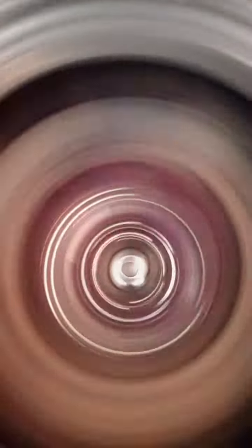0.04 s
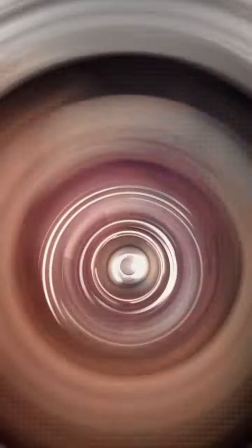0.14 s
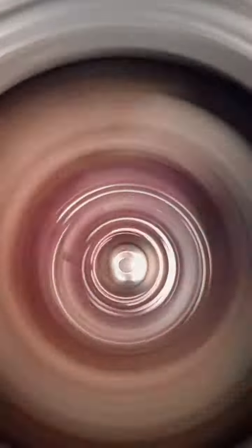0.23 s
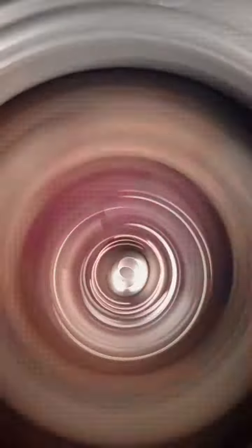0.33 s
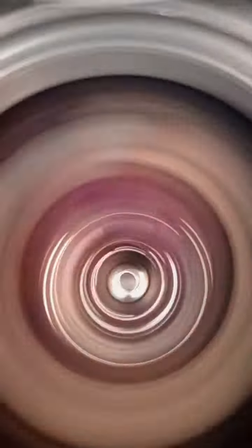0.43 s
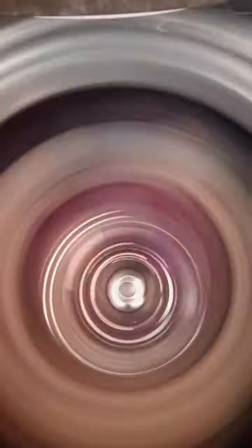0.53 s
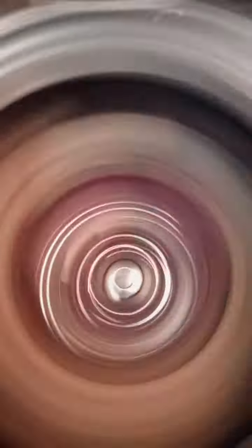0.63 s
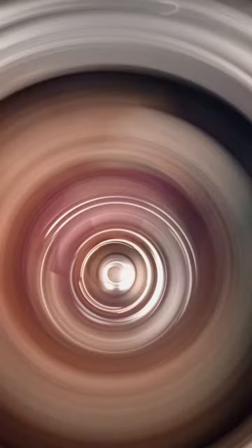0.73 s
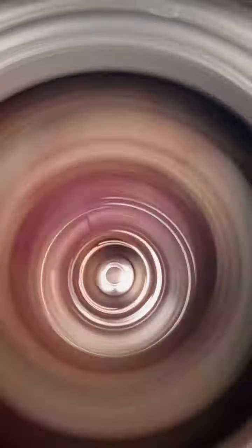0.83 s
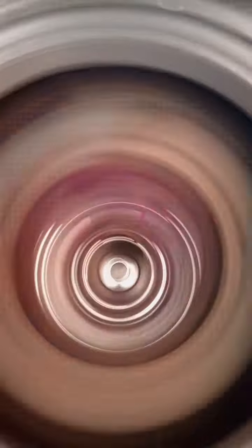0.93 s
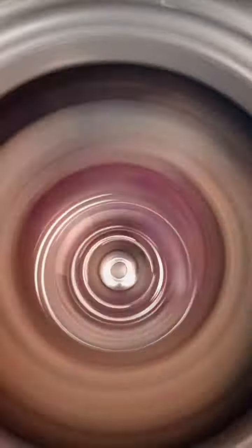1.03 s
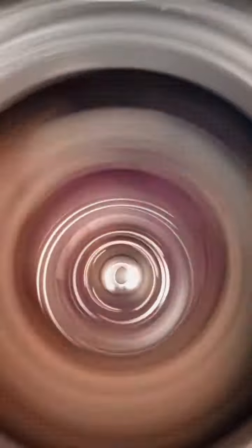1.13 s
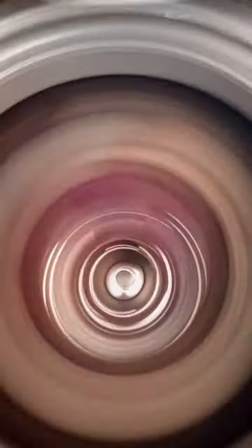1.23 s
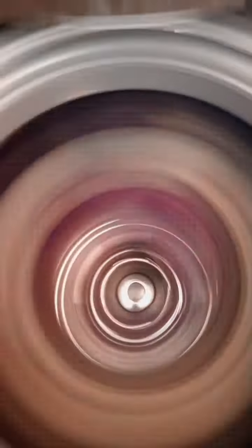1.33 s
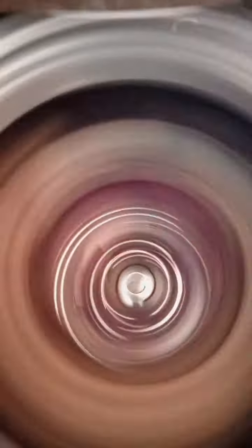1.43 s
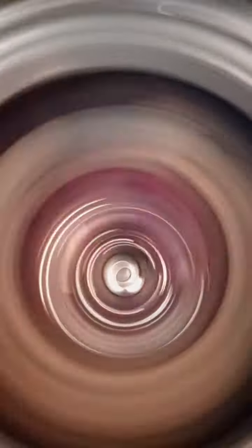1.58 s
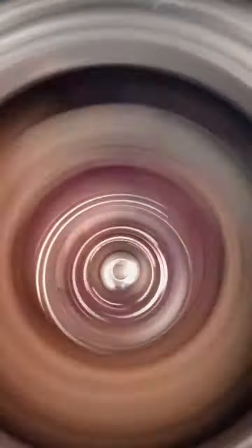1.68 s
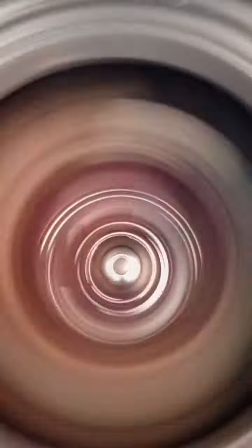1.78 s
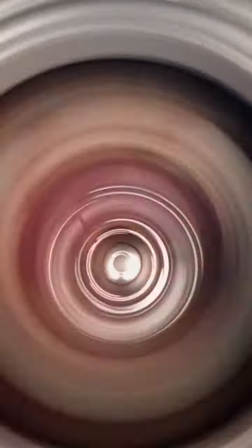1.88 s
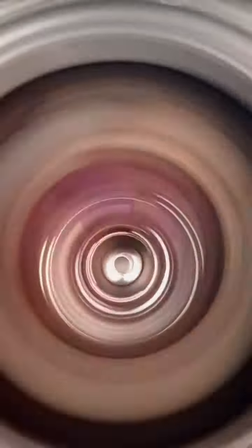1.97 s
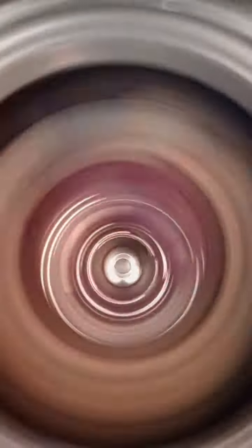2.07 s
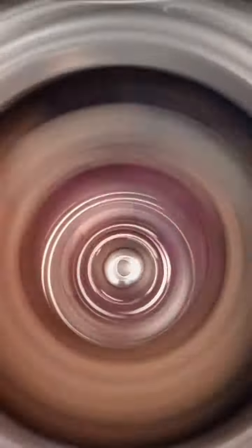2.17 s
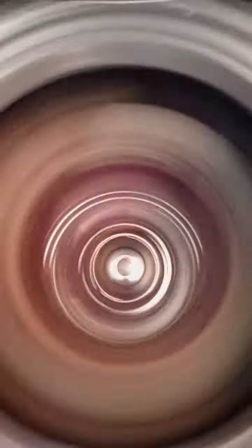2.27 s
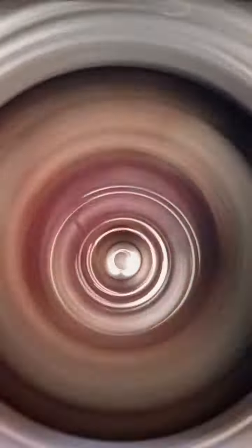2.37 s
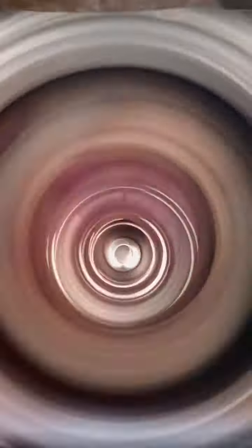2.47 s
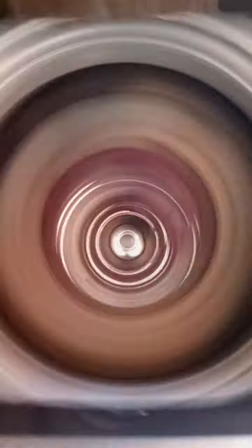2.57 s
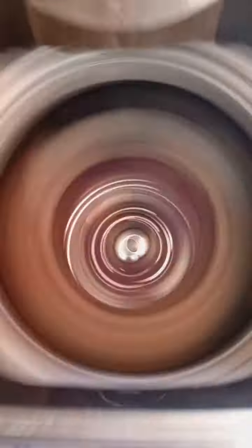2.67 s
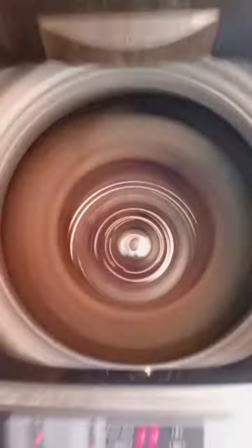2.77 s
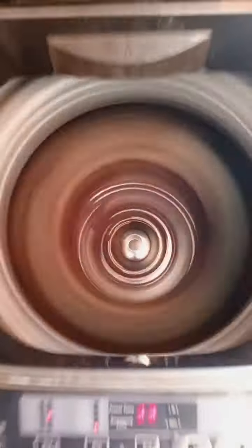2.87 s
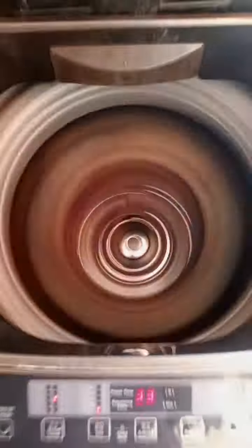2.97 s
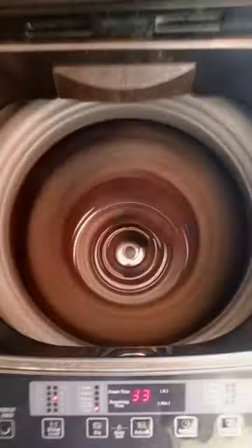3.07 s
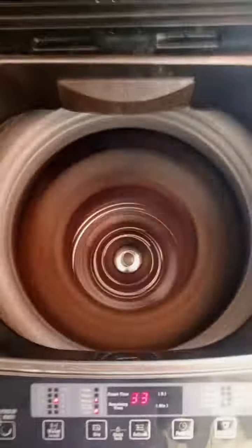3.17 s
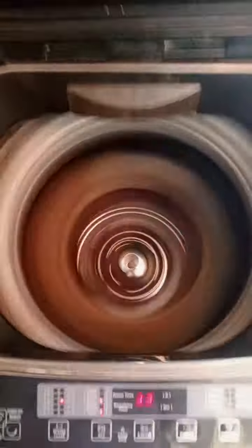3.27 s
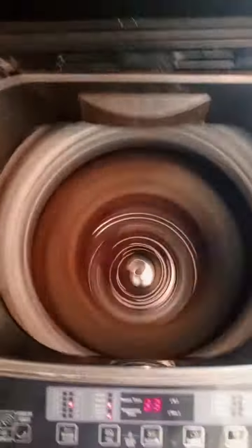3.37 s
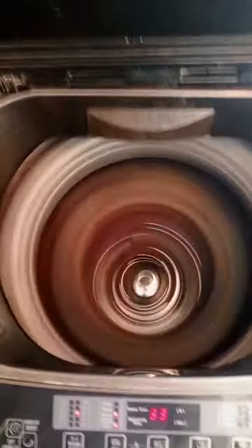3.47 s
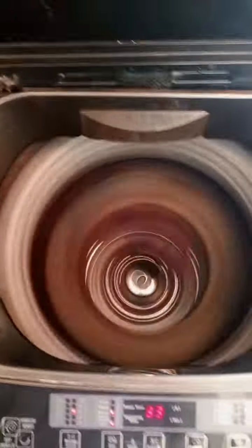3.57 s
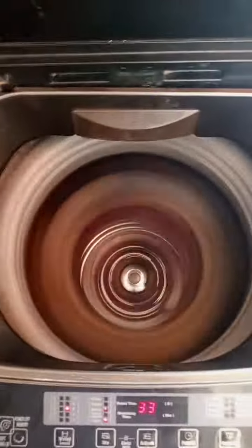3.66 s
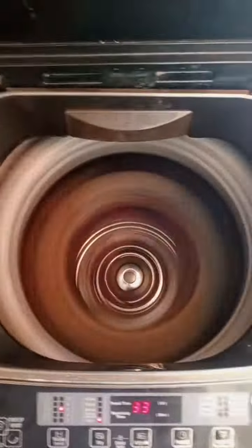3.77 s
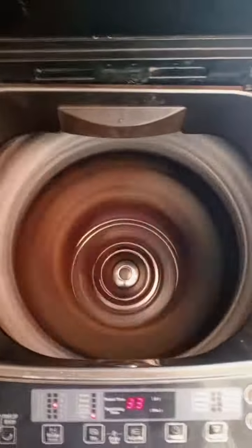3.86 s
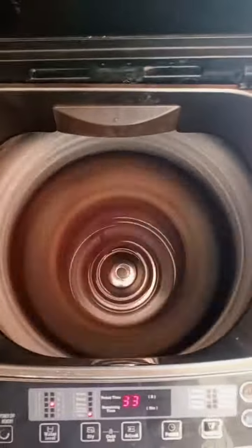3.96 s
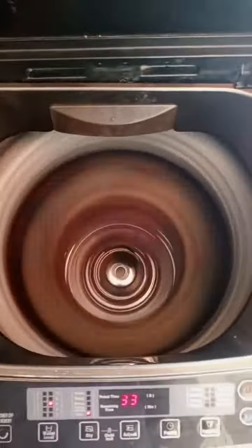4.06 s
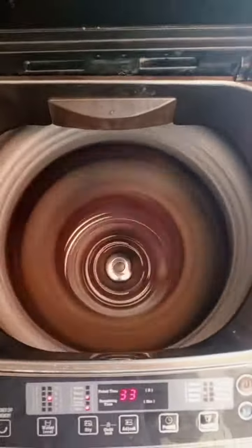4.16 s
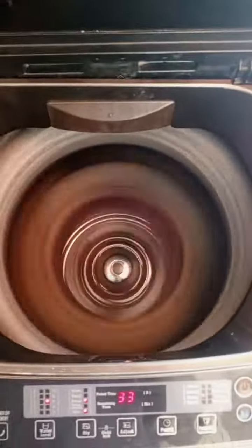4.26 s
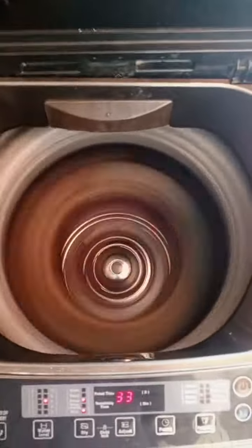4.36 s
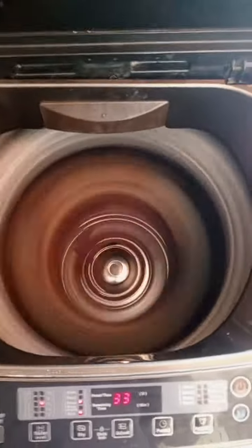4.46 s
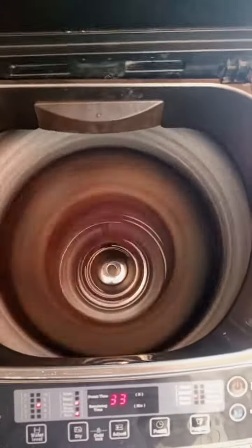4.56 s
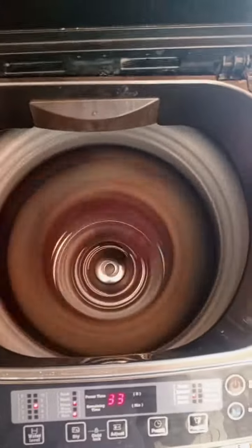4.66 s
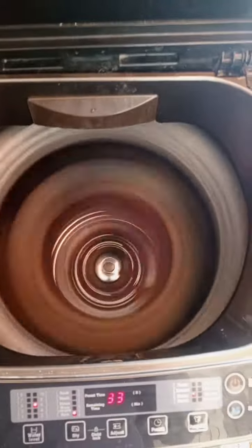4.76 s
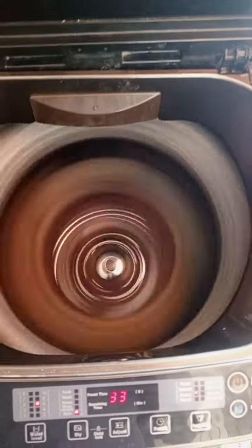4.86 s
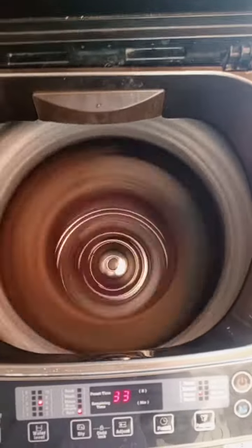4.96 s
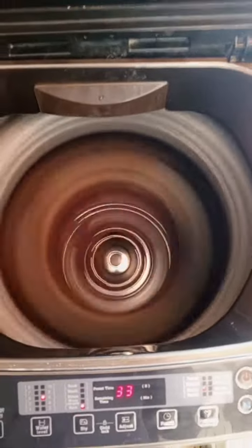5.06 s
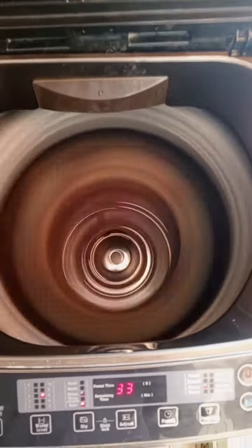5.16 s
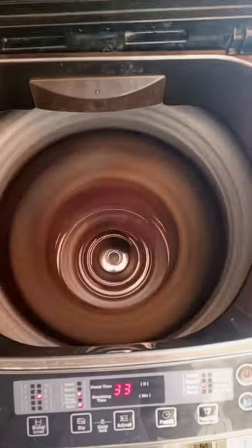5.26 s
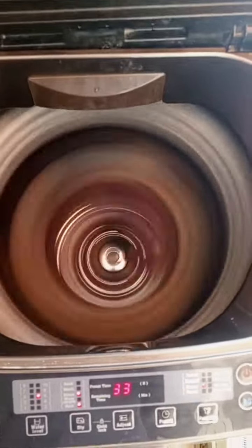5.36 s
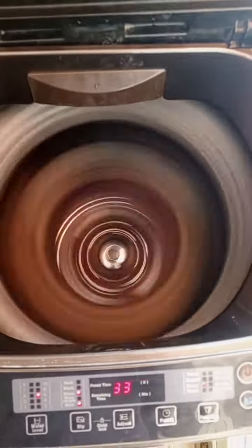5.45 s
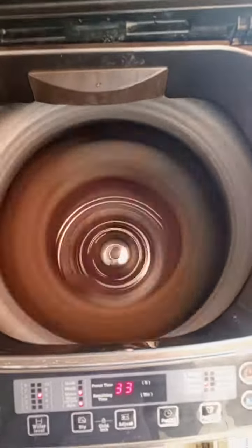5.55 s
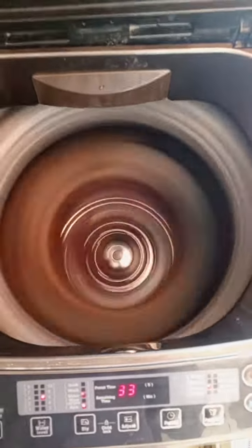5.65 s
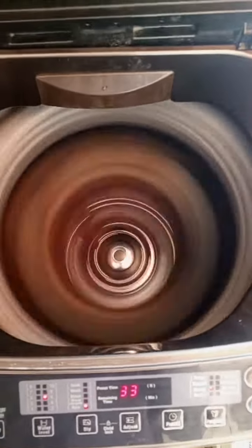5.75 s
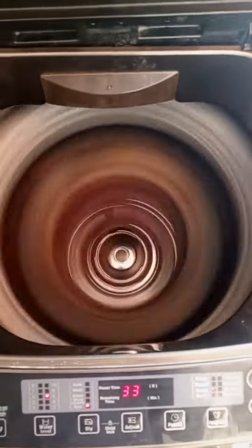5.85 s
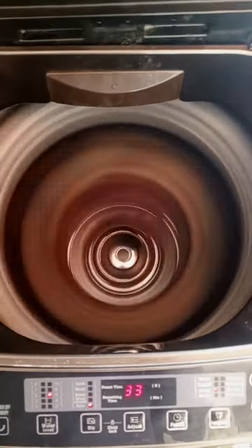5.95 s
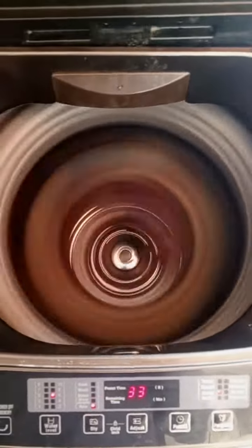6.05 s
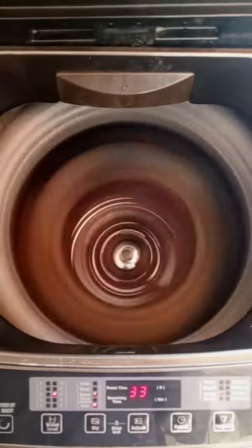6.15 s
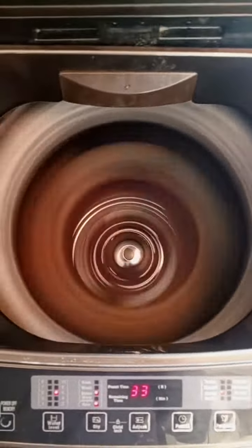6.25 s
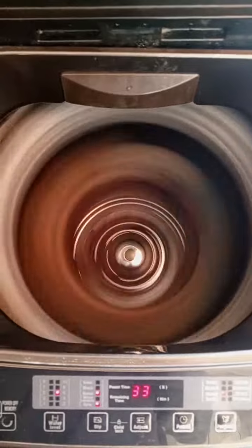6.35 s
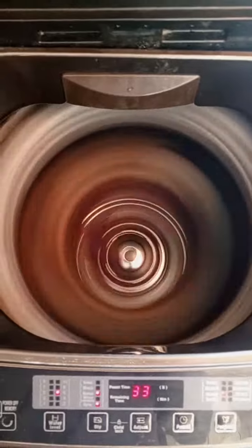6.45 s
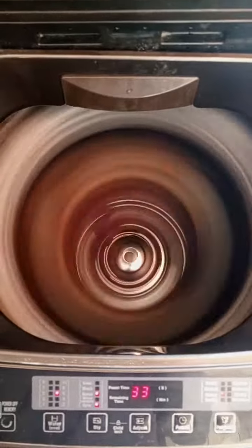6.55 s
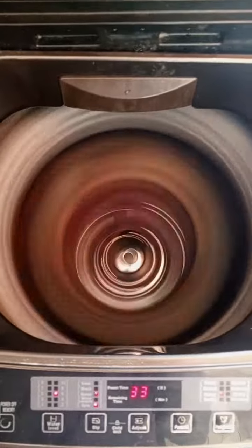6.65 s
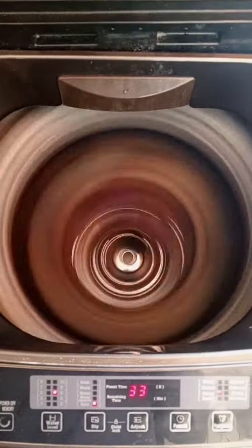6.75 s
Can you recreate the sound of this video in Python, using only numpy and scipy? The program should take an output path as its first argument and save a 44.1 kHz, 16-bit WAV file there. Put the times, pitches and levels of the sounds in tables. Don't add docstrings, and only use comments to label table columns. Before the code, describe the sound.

From 0 s a top-loading washer is in full spin, heard by a hand-held microphone close inside its opening. The unbalanced tub strikes the cabinet nearly twelve times a second: a short boomy thud with a noisy, ringing sheet-metal clack, then a lighter, drier clack halfway to the next. Blow strength rocks gently over roughly three turns. A low steady motor hum and soft air and bearing whir, throbbing with each knock, fill in below. Stray bright ticks stand out near 0.7 and 1.6 s. From about 2.5 to 3.3 s the microphone draws back; everything drops several decibels, with the clacks thinner and the small hard room more audible, the treble shifting with hand movement. At about 3.6 s the motor cuts and its hum quickly vanishes. The drum coasts, still knocking rapidly but slightly more unevenly, slowing to about eleven turns a second by 6.8 s, never stopping.

```python
import sys
import numpy as np
from scipy import signal
from scipy.io import wavfile
from scipy.ndimage import uniform_filter1d

SR = 44100
rng = np.random.default_rng(int(sys.argv[2]) if len(sys.argv) > 2 else 0)


def master_out(mix):
    frames = np.transpose(np.atleast_2d(mix))
    ceiling = np.clip(frames, -1, 1)
    pcm = np.round(ceiling * 32767).astype(np.int16)
    wavfile.write(sys.argv[1], SR, pcm)


def boost(x):
    u = np.asarray(x, float) / 20
    return 10 ** u


N = 300311
LEAD = 2048
MOTOR_OFF_S = 3.62


# t/s, speed/(turns/s)
DRUM_SPEED = [
    (0, 11.934),
    (3.6, 11.908),
    (6.8, 11.139),
]


def turns(t):
    turn_zero_s, step_s = .0612, .001
    grid = np.arange(-.2, 7.2, step_s)
    count = np.cumsum(np.interp(grid, *np.transpose(DRUM_SPEED))) * step_s
    return np.interp(t, grid, count - np.interp(turn_zero_s, grid, count))


def coasting(s):
    return np.maximum(s - MOTOR_OFF_S, 0)


def knocks():
    rock_per_turn, rock_first_turn = .3073, 1.69
    rock_db, rock_coasting_db_per_s, uneven_db = 1.33, 0.3, 0.17
    late_s_per_db = .0004
    t = np.arange(-.1, N / SR, 1 / SR)
    turn = np.arange(-1, np.ceil(turns(N / SR)))
    s = np.interp(turn, turns(t), t)
    rock = np.cos(2 * np.pi * rock_per_turn * (turn - rock_first_turn))
    hard_db = (rock_db + rock_coasting_db_per_s * coasting(s)) * rock
    hard_db = hard_db + uneven_db * rng.standard_normal(len(s))
    return s - late_s_per_db * hard_db, hard_db


# t/s, drawn back/(0-1), distance gain/dB, treble shade/dB
MIC_PATH = [(0, 0.17, 1, 6.5), (.5, .08, -1, 8), (1.6, 0.04, -0.5, 7), (2.45, 0.19, -1, 5.8),
            (2.85, 0.5, -3.5, 2), (3.05, 0.66, -3.5, -3), (3.3, 0.87, -6, 1), (3.6, 0.57, -4.5, 5),
            (3.9, 0.89, -8, 1.5), (4.5, 0.79, -8, -1.5), (5.5, 1, -9.5, 2.5), (6.8, 0.67, -9, 0.5)]


def mic(s, column):
    path = np.array(MIC_PATH)
    return np.interp(s, path[:, 0], path[:, column])


def away(s):
    return np.clip(mic(s, column=1), 0, 1)


def evened(x):
    return x / np.sqrt(np.mean(abs(x) ** 2) + 1e-20)


def read(points, hz):
    f, value = np.transpose(points)
    return np.interp(np.log(hz + 1), np.log(f + 1), value)


def lay(times, sounds):
    mix = np.zeros(LEAD + N + sounds.shape[1])
    for s, sound in zip(times, sounds):
        at = min(LEAD + round(s * SR), LEAD + N)
        mix[at:at + len(sound)] += sound
    return mix[LEAD:LEAD + N]


# f/Hz, t60/s, signed swing close, signed swing away
BODY_MODES = [(88, 0.11, 1.85, 0.57), (101, 0.3, 0.98, 0.72), (128, 0.3, 1.0, 0.42), (153, 0.3, 0.81, 0.95),
              (177, 0.3, 0.77, 0.32), (193, 0.08, -3.55, 3.42), (212, 0.07, -3.56, -6.72),
              (244, 0.15, 1.15, -1.9), (256, 0.12, 1.9, 1.7), (277, 0.07, -0.68, 3.56),
              (324, 0.12, 1.29, 0.81), (343, 0.07, -0.48, 2.35), (384, 0.07, -0.55, 1.35),
              (451, 0.25, 0.07, 0.25), (499, 0.07, 0.48, -0.69), (532, 0.07, -0.12, 0.88),
              (636, 0.08, -0.44, 0.86), (709, 0.16, 0.09, -0.39), (741, 0.11, -0.1, 0.62),
              (843, 0.14, 0.07, -0.22)]


def thuds(s, hard_db):
    thud_db = -15 + mic(s, column=2) + 0.72 * hard_db + .5 * rng.standard_normal(len(s))
    hz, t60_s, close, far = np.transpose(BODY_MODES)
    t = np.arange(SR // 3) / SR
    rings = boost(-60 * t / t60_s[:, None]) * (1 - np.exp(-t / .008))
    phase = 2 * np.pi * hz[:, None] * t
    back = away(s)[:, None]
    swing = (1 - back) * close + back * far
    luck = .06 * rng.standard_normal((len(s), 2, len(hz)))
    x = (swing * (1 + luck[:, 0])) @ (rings * np.sin(phase))
    x += (swing * luck[:, 1]) @ (rings * np.cos(phase))
    x *= (boost(thud_db - .8) / np.sqrt(np.mean(x[:, :700] ** 2, axis=1)))[:, None]
    return lay(s - .0008, x)


# f/Hz, t60/s
NOISE_RING = [(500, 0.11), (1200, 0.054), (2500, 0.044), (5000, 0.07), (9000, 0.06), (14000, 0.03)]


def bursts(colour_db, same, ring, rise_s):
    hz, t = np.fft.rfftfreq(128, 1 / SR), np.arange(160) * 32 / SR
    habit = rng.standard_normal((1, 160, 65, 2))
    chance = rng.standard_normal((len(colour_db), 160, 65, 2))
    z = (same * habit + np.sqrt(1 - same ** 2) * chance) @ [1, 1j]
    decay_db = -60 * t[:, None] / (ring * read(NOISE_RING, hz))
    z = z * boost(colour_db[:, None] + decay_db)
    x = signal.istft(z.transpose(0, 2, 1), nperseg=128, noverlap=96)[1]
    x = x * (1 - np.exp(-np.arange(x.shape[1]) / (rise_s * SR)))
    return x / np.sqrt(np.mean(x[:, :SR // 100] ** 2, axis=1))[:, None]


# t after blow/ms, share of blow
BOUNCES = [
    (0, 1),
    (4.1, .5),
    (8.3, .45),
    (13, .35),
    (19, .25),
]


def panels(modes, blows):
    hz, width_hz, db = np.transpose(modes)
    damping, rise_s = 1.22, 0.0027
    t = np.arange(SR // 8) / SR
    side = (-1) ** np.arange(len(hz))[:, None]
    decay = np.exp(-np.pi * damping * width_hz[:, None] * t)
    rings = side * decay * np.sin(2 * np.pi * hz[:, None] * t)
    strength = boost(db) * np.sqrt(width_hz) * (1 + .12 * rng.standard_normal((blows, len(hz))))
    x = strength @ rings * (1 - np.exp(-t / rise_s))
    luck = rng.uniform(-1.24, 1, (blows, len(BOUNCES)))
    ms, share = np.transpose(BOUNCES)
    at = (ms * (1 + .008 * luck) * SR / 1000).astype(int)
    drive = np.zeros((blows, SR // 40))
    np.put_along_axis(drive, at, share, axis=1)
    x = signal.fftconvolve(x, drive, axes=1)
    return x / np.sqrt(np.mean(x[:, :SR // 100] ** 2))


# f/Hz, width/Hz, level/dB
PANEL_MODES_CLOSE = [(404.4, 41, 6), (629, 31, 4), (777.6, 13, -7.5), (1048, 19, 3), (1249, 49, -0.5),
                     (1585, 50, -0.5), (1390, 17, -8.5), (1970, 76, -3), (2421, 130, 8), (2585, 89, -4),
                     (2965, 69, -3.5), (3247, 104, 0.5), (3914, 220, 7.5), (6780, 140, -9)]
# f/Hz, width/Hz, level/dB
PANEL_MODES_AWAY = [(515, 15, 0.5), (646, 16, -18), (735, 45, -1.5), (873, 54, 8), (1351, 28, 3),
                    (1584, 61, -5.5), (1870, 87, 4), (2310, 160, 7.5), (2500, 61, -11), (3040, 45, -2.5),
                    (3500, 59, -9), (4020, 53, -7), (4706, 45, -7.5), (7840, 400, -17)]
# f/Hz, level/(dB per Hz)
CRACK_CLOSE = [(290, -30), (500, 17.5), (888, -12.5), (1450, 4), (1990, -5), (2430, 3), (2800, -6),
               (3240, -7.5), (4570, -10.5), (5830, -10.5), (6550, -6.5), (10100, -19), (15500, -45)]
# f/Hz, level/(dB per Hz)
CRACK_AWAY = [(290, -60), (500, -7), (781, -4.5), (1130, -32), (1350, -0.5), (1720, -0.5), (2430, -6),
              (2760, -2.5), (3060, -3), (7030, -19.5), (7780, -12.5), (13800, -34), (15500, -49)]


def clacks(s, hard_db):
    treble_close_db, treble_away_db, treble_uneven_db = -13.5, 2.5, 4
    hz, back = np.fft.rfftfreq(128, 1 / SR), away(s)[:, None]
    clack_db = -20.5 + mic(s, column=2) + hard_db
    treble_db = (1 - back) * treble_close_db + back * treble_away_db
    treble_db = treble_db + treble_uneven_db * rng.standard_normal(back.shape)
    colour_db = (1 - back) * read(CRACK_CLOSE, hz) + back * read(CRACK_AWAY, hz)
    colour_db = colour_db + 0.25 * (treble_db - 1) * (hz > 5000)
    crack = bursts(colour_db, same=.94, ring=1.05, rise_s=.001)
    notes = (1 - back) * panels(PANEL_MODES_CLOSE, len(s)) + back * panels(PANEL_MODES_AWAY, len(s))
    return lay(s, boost(clack_db - 3.5)[:, None] * crack) + lay(s, boost(clack_db - 2.5)[:, None] * notes)


# f/Hz, level/(dB per Hz)
SWING_COLOUR = [(500, -28), (1100, -7), (1800, 16), (2600, 6), (3600, 8.5), (4500, 7.5), (5200, -12.5),
                (6500, -4.5), (9000, 3), (12000, -45), (16000, -28)]
# f/Hz, width/Hz, level/dB
RIM_MODES = [(1630, 113, 1), (1890, 100, -2), (2810, 220, -3), (3504, 128, 2), (3810, 73, -7),
             (4380, 110, -8)]


def swings(s):
    lag_s, sooner_s_per_s, loose_s = .0515, 0.0014, .0007
    hz, luck = np.fft.rfftfreq(128, 1 / SR), rng.standard_normal((len(s), 4)).T
    at = s + lag_s - sooner_s_per_s * coasting(s) + loose_s * luck[0]
    swing_db = -29.5 + 0.56 * mic(at, column=2) + 1.74 * luck[1]
    colour_db = read(SWING_COLOUR, hz) - 7 * away(at)[:, None] * (hz > 5200)
    swing = bursts(colour_db, same=.8, ring=1.25, rise_s=.0007)
    rim = np.pad(panels(RIM_MODES, len(s)), ((0, 0), (0, SR // 4)))
    swing = swing + boost(-1.5) * rim[:, :swing.shape[1]]
    rattle_db = -51.5 + .15 * mic(at, column=2) + 0.85 * luck[2]
    rattle = ticks(at + 0.00098, rattle_db, 4700 * np.exp(0.16 * luck[3]))
    return lay(at, boost(swing_db - 5.5)[:, None] * swing) + rattle


def ticks(at, tick_db, tick_hz):
    hz = np.fft.rfftfreq(128, 1 / SR)
    colour_db = -14 * np.log2((hz + 50) / tick_hz[:, None]) ** 2 - 0.0014 * np.maximum(hz - 10500, 0)
    return lay(at, boost(tick_db + 1.5)[:, None] * bursts(colour_db, same=0, ring=.36, rise_s=.0001))


# t/s, level/dB, centre f/Hz
LOOSE_TICKS = [(0.705, -33, 4500), (1.208, -46, 7500), (1.5287, -43, 6500), (1.5603, -32.5, 5900),
               (1.6265, -30, 5740), (1.708, -49, 4685), (1.7799, -47, 7388), (1.793, -41, 4870),
               (2.2, -44, 8593), (2.214, -36, 4940), (2.5485, -44, 6766), (2.7017, -41, 5876),
               (2.9553, -42, 6376), (2.9703, -40, 6100), (3.2193, -46, 4960), (3.3874, -42, 5550),
               (3.4596, -43, 7149), (3.9735, -42, 4580), (4.048, -42, 7229), (4.06, -41, 4747),
               (4.557, -42.5, 5830), (4.9375, -46, 7440), (5.2815, -43, 4200), (5.3505, -36.5, 4100),
               (6.2098, -48, 5021), (6.392, -47, 6000), (6.5686, -46, 6075), (6.6985, -42, 5960)]


def loose_parts():
    return ticks(*np.transpose(LOOSE_TICKS))


def hum():
    motor_hz, sag_db_per_s, dies_db_per_s = 99.22, -1.25, -90
    t = np.arange(N) / SR
    waver = evened(uniform_filter1d(uniform_filter1d(rng.standard_normal(N), size=4000), size=4000))
    motor = (1 + 0.15 * waver) * np.sin(2 * np.pi * motor_hz * t)
    motor_db = -28 + sag_db_per_s * t + 0.73 * mic(t, column=2) + dies_db_per_s * coasting(t)
    fifth = np.sin(2 * np.pi * 5 * turns(t))
    return boost(motor_db + 3) * motor + boost(-34 - 12.8 * away(t)) * fifth


# f/Hz, level/(dB per Hz)
WHIR_COLOUR_CLOSE = [(45, -34), (70, -31), (100, 2), (200, -2.5), (400, -10.5), (800, -17.5), (950, -24.5),
                     (1600, -25), (3900, -32.5), (5200, -35.5), (8000, -37), (10200, -42), (13000, -55.5),
                     (15500, -48)]
# f/Hz, level/(dB per Hz)
WHIR_COLOUR_AWAY = [(45, -34), (80, -7), (140, -2), (250, 3), (400, -7), (850, -16.5), (1150, -18.5),
                    (1600, -22.5), (4200, -28), (5600, -35.5), (8000, -29), (9500, -36), (13500, -52),
                    (15500, -51)]


def whir():
    frames, hz = N // 512 + 5, np.fft.rfftfreq(2048, 1 / SR)
    t = np.arange(frames) * 512 / SR
    a, b, patches = rng.standard_normal((frames, 1025, 3)).T
    patches = uniform_filter1d(patches, size=4, axis=1)
    patches = evened(uniform_filter1d(patches, size=24, axis=0))
    close_db, away_db = read(WHIR_COLOUR_CLOSE, hz)[:, None], read(WHIR_COLOUR_AWAY, hz)[:, None]
    colour_db = (1 - away(t)) * close_db + away(t) * away_db
    gain = boost(colour_db + 0.13 * patches) / np.sqrt(np.mean(boost(colour_db) ** 2, axis=0))
    x = signal.istft((a + 1j * b) * gain, nperseg=2048, noverlap=1536)[1][:N]
    now = np.arange(N) / SR
    throb_db = uniform_filter1d(-5 * (turns(now) % 1), size=300)
    return boost(-23 + 0.67 * mic(now, column=2) + throb_db) * evened(x)


def room(x):
    t60_s = 0.27
    taps = np.zeros(SR // 2)
    at = np.arange(300, len(taps) - 20, 20)
    taps[at + rng.integers(0, 20, len(at))] = rng.choice([-1., 1.], len(at))
    tail = signal.lfilter([1], [1, -.6], taps) * boost(-60 * np.arange(len(taps)) / SR / t60_s)
    wet_db = -15.5 + 4 * away(np.arange(N) / SR)
    return boost(wet_db) * signal.fftconvolve(x, tail / np.linalg.norm(tail))[:N]


def scene():
    s, hard_db = knocks()
    bright = clacks(s, hard_db) + swings(s) + loose_parts()
    body = thuds(s, hard_db)
    echo = room(bright + boost(-12.5) * body)
    return (bright + body + echo + whir() + hum())[None]


def band_limit(x):
    return signal.sosfilt(signal.butter(12, 16670, fs=SR, output="sos"), x)


def record(dry):
    above = signal.firwin(63, [9200, 13000], pass_zero=False, fs=SR)
    treble = signal.oaconvolve(dry, above[None], "same")
    shaded = dry + (boost(mic(np.arange(N) / SR, column=3)) - 1) * treble
    cut = signal.sosfilt(signal.butter(3, 46, "high", fs=SR, output="sos"), shaded)
    below = signal.firwin(1023, 15780, window=("kaiser", 9), fs=SR)
    cut = signal.oaconvolve(cut, below[None], "same")
    return band_limit(cut)


dry = scene()
out = record(dry)
master_out(out)
```